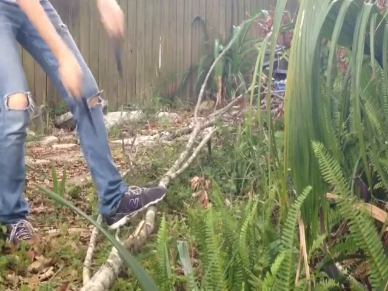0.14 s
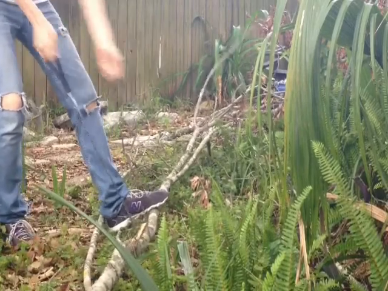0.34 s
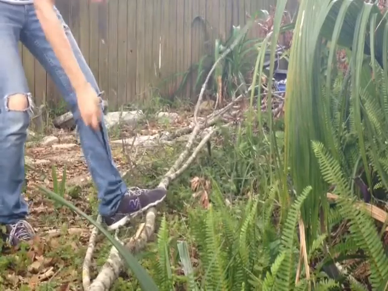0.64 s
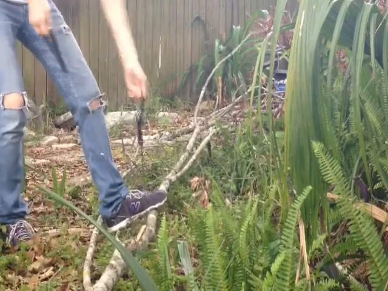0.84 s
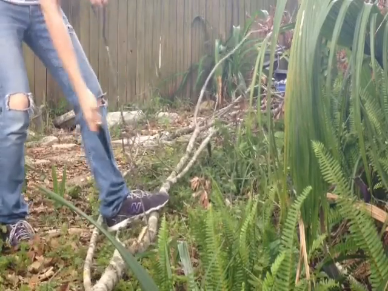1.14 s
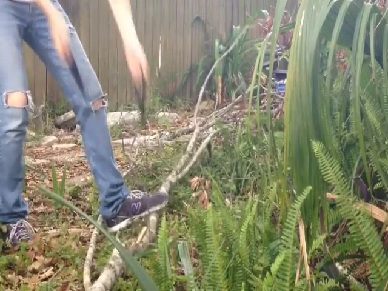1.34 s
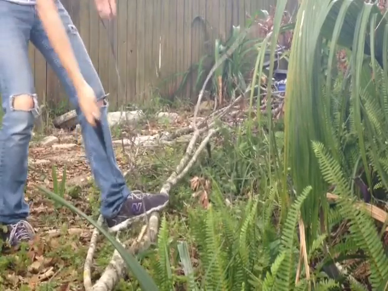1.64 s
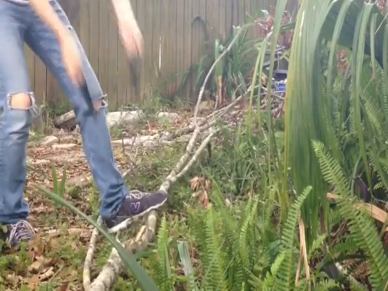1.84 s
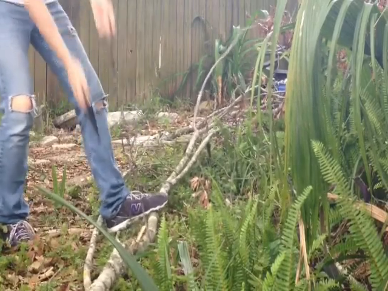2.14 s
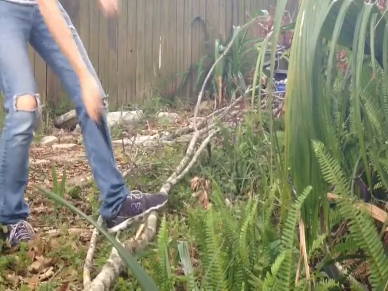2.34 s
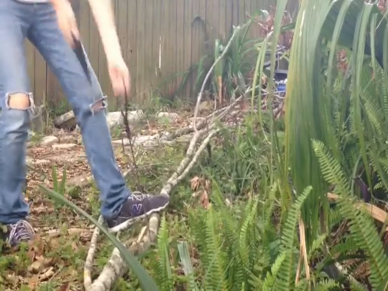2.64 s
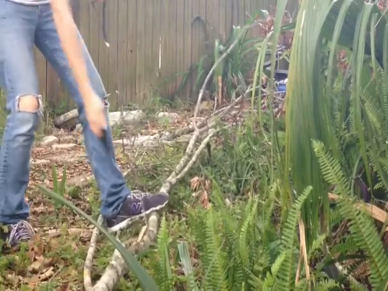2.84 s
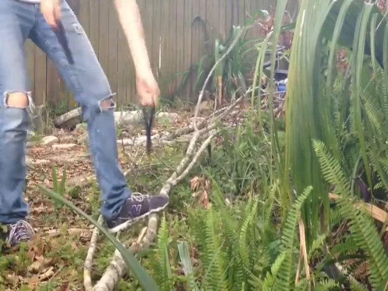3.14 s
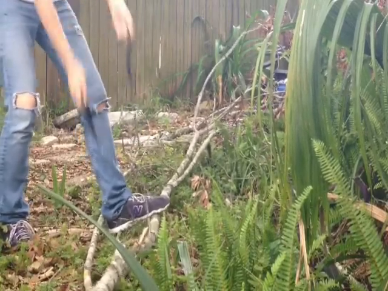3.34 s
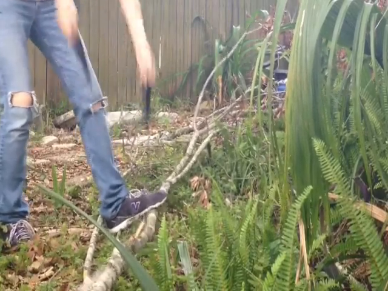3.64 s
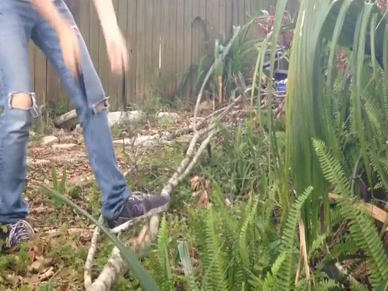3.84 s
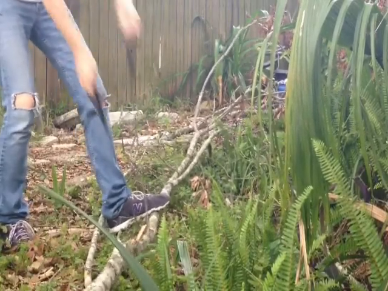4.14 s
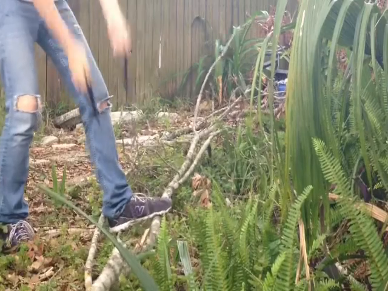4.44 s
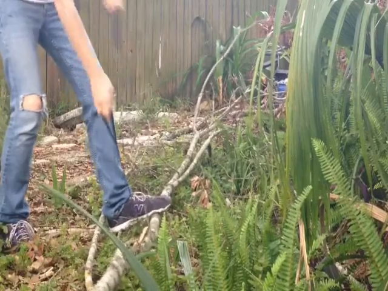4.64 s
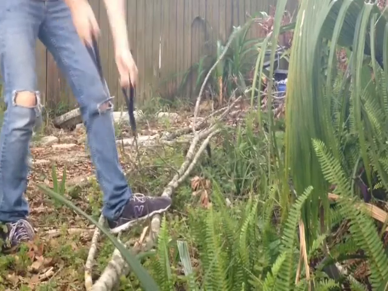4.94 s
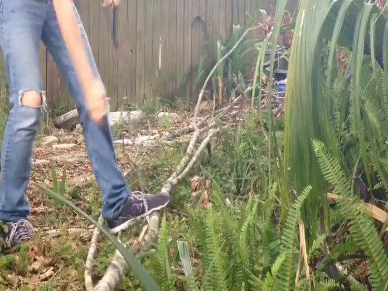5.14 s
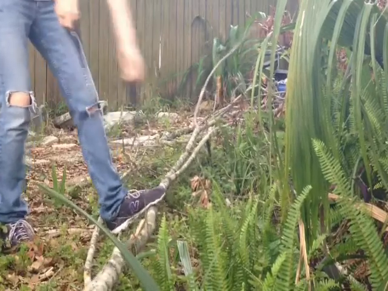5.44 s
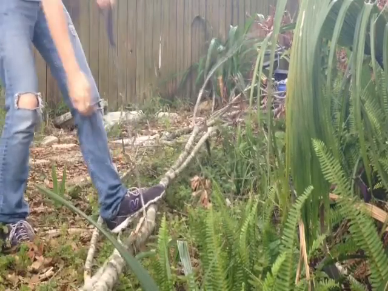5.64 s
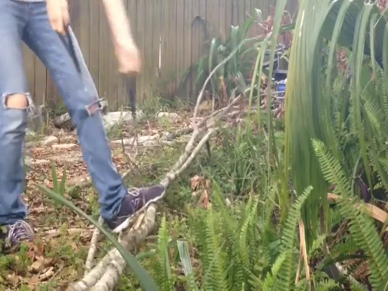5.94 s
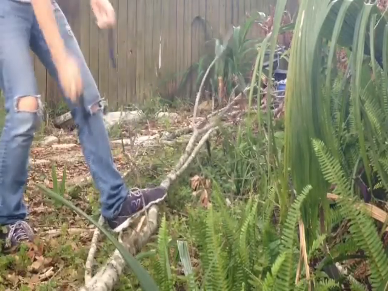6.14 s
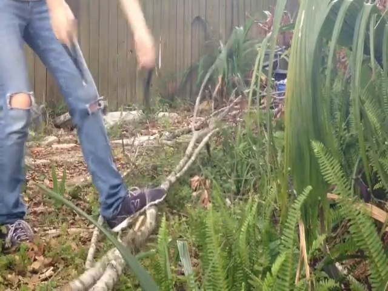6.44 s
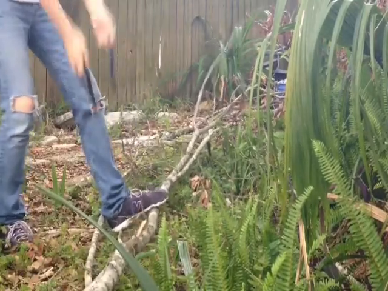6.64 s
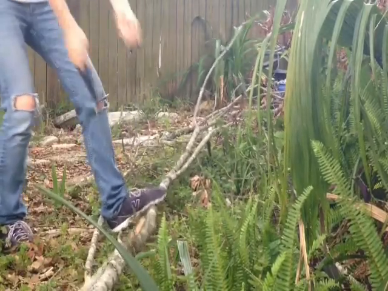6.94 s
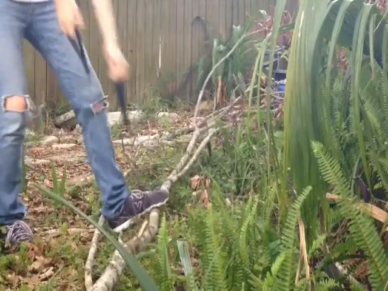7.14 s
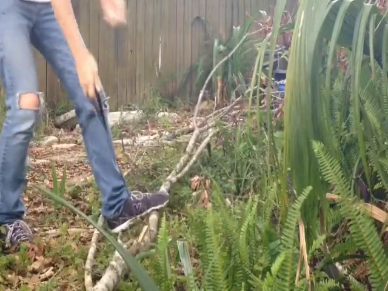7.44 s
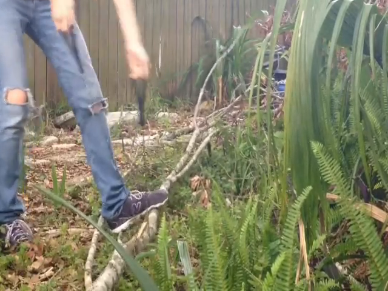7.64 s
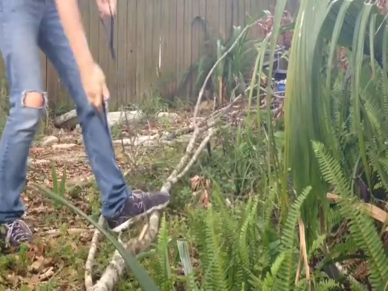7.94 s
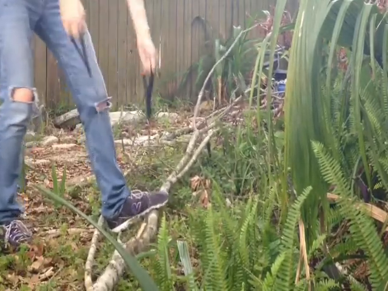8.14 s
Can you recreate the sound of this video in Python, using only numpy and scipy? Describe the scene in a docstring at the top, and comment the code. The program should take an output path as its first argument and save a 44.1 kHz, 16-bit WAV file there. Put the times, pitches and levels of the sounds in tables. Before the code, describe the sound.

From the first moment, a hand chain saw is pulled back and forth through a fallen limb, close by, at about three and a half strokes a second. Each stroke starts with dense, woody clicking and builds into a rasp of tearing fibres and hissing chips. Teeth snag throughout with small cracks and knocks, and the links add thin, bright ticks. The limb thumps softly on the ground at about 0.3, 0.7, 2.1 and 2.4 seconds, and more faintly later. A nearby plank fence gives a very short, bright echo. The rhythm holds steady until about 5.7 seconds, then the pulls become weaker and less even as the chain judders more. From about 7 seconds the snags are mostly dull knocks, and the sawing carries on to the end, a little past 8 seconds. A faint distant traffic hum and soft leaf hiss lie underneath throughout.

```python
"""A hand chain saw works through a fallen limb in a garden, over a distant hum and leaf hiss.
From the start it is pulled to and fro, about three and a half strokes a second: the teeth bite in dense
uneven clicks that ring the limb, and each pull builds into tearing fibres and hissing chips.
Teeth snag with a knock, links tick, the limb jolts, and a close plank fence throws back a bright slap.
As the cut deepens the chain judders more, and the last pulls come weaker and less even."""
import sys
import numpy as np
from scipy import signal
from scipy.fft import rfft, irfft
from scipy.io import wavfile
from scipy.ndimage import uniform_filter1d

SR = 44100
rng = np.random.default_rng(int(sys.argv[2]) if len(sys.argv) > 2 else 0)


def master(y):
    """Save y as 16-bit WAV."""
    cut = np.clip(np.atleast_2d(y).T, -1, 1)
    pcm = np.round(cut * 32767)  # scale
    wavfile.write(sys.argv[1], SR, pcm.astype(np.int16))


N = 366030

# A tooth snags: start_s, crack_db, thud_db, sizzle_db (the last two relative to the crack)
TOOTH_SNAGS = [(0.1737, -15.5, -13, -24), (0.2486, -11, -15, -21), (0.3999, -20.5, -10.5, -23),
               (0.4998, -10.5, -21, -27), (0.6738, -38.5, 8, -42), (0.736, -23, -4, -18),
               (0.7738, -18, -15, -18), (0.7978, -13.5, -21, -20), (0.9427, -34, 1.5, -32),
               (0.9901, -12.5, -17.5, -32), (1.0876, -10.5, -19, -18), (1.1454, -10.5, -16.5, -32),
               (1.3403, -17.5, -19, -18), (1.3558, -22, -9, -14), (1.512, -22.5, -9, -36),
               (1.574, -23.5, -7, -24), (1.6381, -13, -17, -38), (1.68, -12, -14, -32),
               (1.8567, -26, -5, -14), (1.9036, -21, -6.5, -29), (2.102, -12.5, -9, -20),
               (2.156, -19.5, -10, -13), (2.222, -11.5, -18.5, -34), (2.4514, -22, -15, -11),
               (2.479, -11, -14, -26), (2.7051, -12, -15.5, -19), (2.7976, -15, -22, -21),
               (3.039, -16, -14, -23), (3.0904, -16, -12, -17), (3.222, -30.5, -10.5, -9),
               (3.3058, -9, -15.5, -25), (3.372, -24.5, -2, -25), (3.3958, -13.5, -15.5, -19),
               (3.436, -12.5, -17.5, -34), (3.6408, -15.5, -21, -22), (3.8196, -37, 5, -34),
               (3.862, -10.5, -15.5, -26), (3.9462, -12, -14, -16), (4.212, -23, -20, -17),
               (4.3932, -20, -5, -35), (4.4313, -8, -11.5, -28), (4.5237, -19.5, -21, -16),
               (4.7462, -20.5, -14, -19), (4.8051, -18.5, -7, -20), (4.999, -11.5, -14.5, -19.5),
               (5.0957, -20.5, -12, -25), (5.2751, -27.5, -13, -17), (5.3427, -17.5, -16, -15),
               (5.524, -25.5, -7, -27), (5.599, -17.5, -9.5, -28), (5.6364, -11.5, -20.5, -21),
               (5.8293, -19.5, -4, -31), (5.954, -38, -15, 1), (5.8793, -17.5, -7.5, -10.5),
               (6.0312, -27, -1.5, -13), (6.2093, -9, -17, -27), (6.3745, -39.5, 8.5, -18),
               (6.4433, -18, -17, -19), (6.655, -32.5, 2.5, -18), (6.7448, -15.5, -12.5, -17),
               (6.9095, -18.5, -7.5, -15.5), (6.995, -23, -12, -13), (7.1993, -31, 3.5, -12),
               (7.232, -33, -3, -6), (7.28, -31.5, 2, -12), (7.3529, -15.5, -13, -19),
               (7.3966, -34.5, -1, -11), (7.5035, -33, 5, -47), (7.5555, -34, -5, -22),
               (7.581, -30, 2, -20), (7.6151, -33, 2, -23), (7.7517, -32, 2, -28),
               (7.7914, -29, -6.5, -7.5), (7.8242, -24, -0.5, -26), (7.883, -19, -13.5, -15),
               (8.0301, -38, 7.5, -16), (8.076, -30.5, 4.5, -28), (8.1246, -15, -12, -12.5)]


def amp(db):
    return 10 ** (np.asarray(db) / 20)


def unit_rms(x):
    return x / np.sqrt(np.mean(x ** 2) + 1e-20)


def drift(rate_hz):
    """A smooth random wander with a spread of 1."""
    pole = np.exp(-2 * np.pi * rate_hz / SR)
    return unit_rms(signal.lfilter([1], [1, -2 * pole, pole * pole], rng.standard_normal(N + SR))[SR:])


def resonate(x, hz, width_hz):
    """One resonance with unity gain at its peak."""
    r = np.exp(-np.pi * width_hz / SR)
    gain = (1 - r * r) / 2
    return signal.lfilter([gain, 0, -gain], [1, -2 * r * np.cos(2 * np.pi * hz / SR), r * r], x + 1e-18)


def colour(x, spectrum):
    """A minimum-phase EQ that follows the given curve, built from the folded cepstrum."""
    hz, db = np.transpose(spectrum)
    curve_db = np.interp(np.log(np.linspace(1, SR / 2, 2049)), np.log(hz), db)
    cepstrum = irfft(curve_db * np.log(10) / 20)
    cepstrum[1:2048] *= 2
    cepstrum[2049:] = 0
    return signal.fftconvolve(x, irfft(np.exp(rfft(cepstrum))))[:N]


def bursts(starts_s, levels_db, rise_s, t60_s, tail_db=-14, tail_t60_s=0.18):
    """Noise bursts: a quick attack, a short crack and a weaker crumbling tail."""
    out, t = np.zeros(N + SR), np.arange(SR // 10) / SR
    envelope = np.minimum(t / rise_s, 1) * (amp(-60 * t / t60_s) + amp(tail_db - 60 * t / tail_t60_s))
    for start_s, level_db in zip(starts_s, levels_db):
        at = round(start_s * SR)
        out[at:at + len(t)] += amp(level_db) * envelope * rng.standard_normal(len(t))
    return out[:N]


def garden():
    """The bed: far traffic and leaf hiss as soft dull noise, with three wavering low tones."""
    # Tone of the outdoor air: freq_hz, level_db
    air_eq = [(15, -74), (35, -5), (60, 0), (125, -12), (175, -9), (420, -10.5), (650, -19.5), (1100, -15),
              (2000, -24.5), (7000, -29.5), (16000, -30.5)]
    # Distant hum: pitch_hz, waver_hz, start_db, end_db
    hum_tones = [(57, 3, -54, -55), (95, 2, -60, -51), (119, 2, -53, -56)]
    bed = amp(-51.5 + .8 * drift(.7)) * unit_rms(colour(rng.standard_normal(N), air_eq))
    for pitch_hz, waver_hz, start_db, end_db in hum_tones:
        phase = 2 * np.pi * np.cumsum(pitch_hz + waver_hz * drift(3)) / SR
        tone = np.sin(phase) * amp(3.5 * drift(2))
        bed += amp(np.linspace(start_db, end_db, N)) * unit_rms(tone)
    return bed


def fence_echo(x, delay_s=.0155, t60_s=0.2):
    """A bright slap off the fence and a short scattered tail from planks and shrubs."""
    lag, t = round(delay_s * SR), np.arange(round(t60_s * SR)) / SR
    slap = signal.sosfilt(signal.butter(1, [3200, 7300], "band", fs=SR, output="sos"), x)
    scatter = rng.standard_normal(len(t)) * amp(-60 * t / t60_s) * np.minimum(t / 0.0012, 1)
    scatter = signal.sosfilt(signal.butter(1, [900, 7000], "band", fs=SR, output="sos"), scatter)
    tail = signal.fftconvolve(x, scatter / np.sqrt(np.sum(scatter ** 2)))[:N]
    return amp(-8) * np.r_[np.zeros(lag), slap[:N - lag]] + amp(-15.5) * tail


def ground_thumps(pitch_hz=99, width_hz=70):
    """The limb jolts on the ground: each time a soft push of about one bass cycle."""
    # Jolts: start_s, level_db (relative)
    jolts = [(0.314, -33), (0.71, -30), (2.082, -27.5), (2.431, -26), (3.043, -44), (4.384, -44),
             (5.352, -44), (6.483, -38), (6.835, -43)]
    kicks = np.zeros(N)
    for start_s, level_db in jolts:
        kicks[round(start_s * SR)] = amp(level_db + 44)
    return resonate(resonate(kicks, pitch_hz, width_hz), pitch_hz, width_hz)


def link_ticks():
    """Links and twigs give thin bright clicks, each with a pitch of its own."""
    # Single ticks: start_s, level_db (relative), pitch_hz
    ticks = [(1.0888, -32, 8600), (2.167, 0, 10400), (3.222, -18, 11400), (3.3074, -32, 8680),
             (3.9499, -25, 9080), (4.127, -16, 10600), (4.7556, -9, 13300), (5.004, -20, 8100),
             (5.3477, -10, 7890), (6.2108, -7, 7890), (6.4098, -15, 9410), (6.744, -22, 7790),
             (6.9056, -17, 8920), (6.9601, -7.5, 9000)]
    return sum(resonate(bursts([start_s], [level_db + 2.5], 0.0018, 0.0043, tail_db=-42), pitch_hz, 1500)
               for start_s, level_db, pitch_hz in ticks)


def link_rattle(motion, per_s=45, pitches_hz=(6500, 9000, 12000, 14500)):
    """Loose links tick in sparse clumps as the chain moves, each on one of a few broad bright rings."""
    hits = rng.random(N) < per_s * amp(6 * drift(8)) / SR
    clicks = hits * amp(22 + 4 * np.minimum(rng.exponential(1, N), 3)) * motion
    choice = rng.integers(0, len(pitches_hz), N)
    return sum(resonate(clicks * (choice == k), hz, width_hz=1670) for k, hz in enumerate(pitches_hz))


def wood(x, modes, uneven_db, shift_db, recolour, grip_s=0.2892):
    """Contacts drive each mode unevenly; the balance moves as the grip shifts and the cut deepens."""
    t, grip_times = np.arange(N) / SR, np.arange(40) * grip_s
    out = np.zeros(N)
    for k, (hz, width_hz, level_db) in enumerate(modes):
        contact_db = uneven_db * drift(233)
        depth_db = np.interp(hz, *np.transpose(recolour)) * t / t[-1]
        grip_db = shift_db * np.interp(t, grip_times, rng.standard_normal(len(grip_times)))
        out += (-1) ** k * amp(level_db) * resonate(x * amp(contact_db + depth_db + grip_db), hz, width_hz)
    return out


def chip_hiss(chips):
    """Chips and shaken leaves hiss, with an extra sizzle at each snag."""
    # Tone of the chips: freq_hz, gain_db
    chip_eq = [(2940, -8), (5000, -9.5), (7460, -13.5), (9920, -14), (14700, -20.5), (15600, 12)]
    start_s, crack_db, _, sizzle_db = np.transpose(TOOTH_SNAGS)
    sizzles = bursts(start_s, crack_db + sizzle_db + 10, rise_s=0.0034, t60_s=0.055)
    return colour(chips + sizzles, chip_eq)


def snag_snaps():
    """The sharp break inside each snag; a dull, thudding snag breaks less sharply."""
    start_s, crack_db, thud_db, _ = np.transpose(TOOTH_SNAGS)
    snap_db = crack_db - 0.67 * thud_db - 4.5
    snaps = bursts(start_s + 0.000988, snap_db, rise_s=0.001, t60_s=0.013, tail_db=-23)
    return resonate(snaps, hz=3700, width_hz=1780)


def fibre_tear(fibres):
    """Fibres rip and snags crack: a midrange rasp that also rings the walls of the cut."""
    # Tone of tearing wood: freq_hz, gain_db
    tear_eq = [(760, -53), (1300, 1), (1700, -6.5), (2500, -6), (2990, -8), (4270, -16), (9000, -34),
               (11700, -86), (19800, -120)]
    # Resonances of the cut's walls: pitch_hz, width_hz, level_db
    cut_modes = [(1995, 87, -2.5), (2555, 180, 6.5), (2708, 184, 2.5), (3393, 440, -7.5), (3460, 81, -1.5),
                 (4050, 80, -1)]
    start_s, crack_db, _, _ = np.transpose(TOOTH_SNAGS)
    torn = fibres + bursts(start_s, crack_db, rise_s=0.0023, t60_s=0.027)
    walls = wood(torn, cut_modes, uneven_db=4.0, shift_db=2.0, recolour=[(2600, -1.4)])
    return amp(3) * colour(torn, tear_eq) + amp(-2.9) * walls


def limb_ring(teeth):
    """Tooth bites and the thud of each snag ring the limb: the woody body of the sound."""
    # Modes of the limb: pitch_hz, width_hz, level_db
    limb_modes = [(131.7, 53, -7), (225.5, 49, -4), (300.3, 32, 0), (352, 78, -7), (460.4, 51, -0.5),
                  (621, 42, -5), (791.7, 46.4, 1), (890, 51, -2.5), (1034.6, 41, 1), (1152, 54, -1),
                  (1247, 114, -2), (1446, 85, -8.5), (1537, 52, -7)]
    # How the ring has changed once the cut is deep: freq_hz, gain_db
    deep_cut_eq = [(250, -1), (480, 2), (830, -1.5), (1250, 0), (1530, -4)]
    start_s, crack_db, thud_db, _ = np.transpose(TOOTH_SNAGS)
    thuds = bursts(start_s, crack_db + thud_db + 17.5, rise_s=0.00032, t60_s=0.024)
    return wood(teeth + thuds, limb_modes, uneven_db=2.0, shift_db=1.94, recolour=deep_cut_eq)


def bites(per_s, spread_db):
    """Random tooth clicks, a few of them large, kept at an even loudness over 30 ms."""
    sizes = amp(spread_db * np.minimum(rng.exponential(1, N), 3)) * rng.choice([-1, 1], N)
    clicks = sizes * (rng.random(N) < per_s / SR)
    power = uniform_filter1d(clicks ** 2, size=1300)
    return unit_rms(clicks / np.sqrt(power + .1 * power.mean()))


def pull_envelopes():
    """Each pull takes the load, holds and lets go; tear and hiss build with chain speed and die slower."""
    # Pulls: start_s, attack_s, length_s, ring_db (mid-pull), change_db (over the pull),
    # tear_db (at the end, relative to the ring), run_on_s (tear and hiss hold), hiss_db (at the end)
    strokes = [(-0.2, 0.05, 0.2, -37, 0, 2, 0.02, -48.5),
               (0.083, 0.052, 0.17, -31.5, 5, 3.5, 0.0035, -46.5),
               (0.35, 0.065, 0.2, -29.5, -6.5, 2.5, 0.0024, -49),
               (0.648, 0.077, 0.19, -28.5, 1, -0.5, 0.0023, -49.5),
               (0.908, 0.094, 0.22, -31, -7, 0.5, 0.033, -44.5),
               (1.215, 0.053, 0.17, -32.0, 11.5, 0.5, 0.0043, -48.5),
               (1.475, 0.1, 0.2, -28.5, -16, 0, 0.036, -44.5), (1.756, 0.085, 0.16, -32, 11, 2, 0.004, -50),
               (2.024, 0.088, 0.2, -29.5, -5.5, 0, 0.018, -46.0),
               (2.314, 0.074, 0.2, -31.0, 2.5, -1, 0.0039, -46.5),
               (2.623, 0.12, 0.22, -28, -18.5, -1, 0.0043, -45),
               (2.941, 0.055, 0.17, -31, 8, 0, 0.0027, -47),
               (3.206, 0.12, 0.21, -32.5, -16, 5.5, 0.065, -46.0),
               (3.52, 0.041, 0.17, -32.5, 8, 0, 0.0034, -46.5),
               (3.778, 0.04, 0.19, -32, -1, -0.5, 0.005, -43.5),
               (4.074, 0.091, 0.18, -30, 0, -0.5, 0.0036, -45),
               (4.332, 0.15, 0.22, -28, -8.5, 2.5, 0.0057, -44),
               (4.651, 0.085, 0.17, -28, -0.5, -2.5, 0.0042, -45),
               (4.938, 0.081, 0.18, -32, -12, 0.5, 0.012, -44.5),
               (5.222, 0.051, 0.17, -32.5, -2, 0.5, 0.0046, -47.5),
               (5.497, 0.076, 0.17, -31.5, -9, 1.5, 0.005, -44.5),
               (5.756, 0.037, 0.16, -37.5, -3, 1, 0.015, -43.5),
               (5.997, 0.094, 0.17, -38.5, 7.5, 2.5, 0.011, -48.5),
               (6.192, 0.041, 0.041, -39.5, -31, 17.0, 0.005, -47),
               (6.315, 0.064, 0.18, -38, -8, 2.5, 0.0056, -47.5),
               (6.567, 0.093, 0.16, -31, -16, 0.5, 0.051, -47),
               (6.83, 0.072, 0.21, -36, 1.5, -0.5, 0.013, -46),
               (7.167, 0.029, 0.11, -35.5, -11.0, 0, 0.027, -49),
               (7.324, 0.025, 0.088, -51, -23, 14.5, 0.019, -52),
               (7.445, 0.096, 0.15, -32, -11, -1.5, 0.02, -47.5),
               (7.728, 0.019, 0.15, -39.5, -11, 3.0, 0.07, -46.5),
               (8.005, 0.053, 0.16, -34.5, -11.5, -2, 0.025, -48)]
    ring_fall_db_per_s, tear_fall_db_per_s, hiss_fall_db_per_s = 674, 279, 112
    tear_build_db, hiss_build_db = 5, 9.5
    t = np.arange(0, N + 44, 44) / SR
    ring, tear, hiss = np.zeros((3, len(t)))
    for start_s, attack_s, length_s, ring_db, change_db, tear_db, run_on_s, hiss_db in strokes:
        load = np.clip((t - start_s) / attack_s, 0, 1) ** 1.62
        to_go = np.clip(1 - (t - start_s) / length_s, 0, 1)
        after_s = np.maximum(t - start_s - length_s, 0)
        late_s = np.maximum(after_s - run_on_s, 0)
        pull_db = ring_db + change_db * (.5 - to_go)
        ring += load * amp(pull_db - ring_fall_db_per_s * after_s)
        tear += load * amp(pull_db + tear_db - tear_build_db * to_go - tear_fall_db_per_s * late_s)
        hiss += load * amp(hiss_db - hiss_build_db * to_go - hiss_fall_db_per_s * late_s)
    return [np.interp(np.arange(N) / SR, t, layer) for layer in (ring, tear, hiss)]


def sawing():
    """The teeth drive limb, fibres and chips together; the chain judders, so the bite comes in lumps."""
    # The chain catches more as the cut deepens: time_s, spread_db
    judder_depth = [(0, 1.1), (8.3, 3)]
    ringing, tearing, hissing = pull_envelopes()
    judder = amp(np.interp(np.arange(N) / SR, *np.transpose(judder_depth)) * drift(40))
    teeth = bites(per_s=900, spread_db=6.5)
    fibres = unit_rms(0.36 * teeth + bites(per_s=5000, spread_db=3.2))
    chips = unit_rms(0.29 * teeth + rng.standard_normal(N))
    ring = limb_ring(teeth * ringing * judder * amp(13.5))
    tear = fibre_tear(fibres * tearing * judder)
    hiss = chip_hiss(chips * hissing * amp(11.5))
    return ring + tear + hiss + link_rattle(hissing)


def scene():
    """The mono mix; the limb shields the snaps from the direct path, so the fence returns them best."""
    saw = sawing() + link_ticks()
    snaps = snag_snaps()
    direct = saw + amp(-23.5) * snaps
    echo = fence_echo(amp(-1.0) * saw + snaps)
    return (direct + echo + ground_thumps() + garden())[None]


def record(dry, low_cut_hz=45, high_cut_hz=15950):
    """The lowest bass rolls off and the very top is cut steeply."""
    thinned = signal.sosfilt(signal.butter(3, low_cut_hz, "high", fs=SR, output="sos"), dry)
    return signal.sosfilt(signal.cheby2(14, 70, high_cut_hz, fs=SR, output="sos"), thinned)


dry = scene()
out = record(dry)
master(out)
```